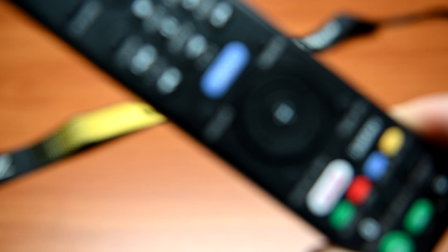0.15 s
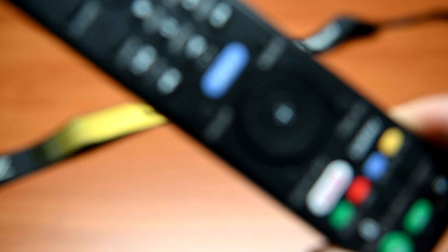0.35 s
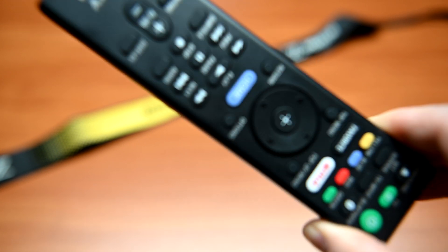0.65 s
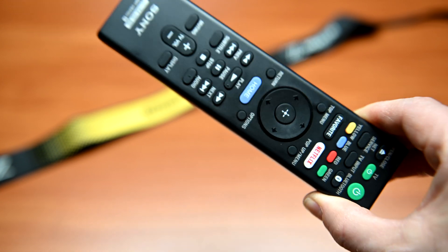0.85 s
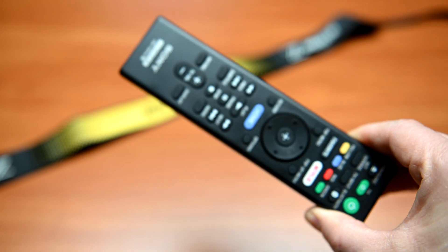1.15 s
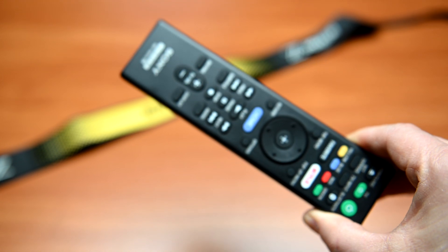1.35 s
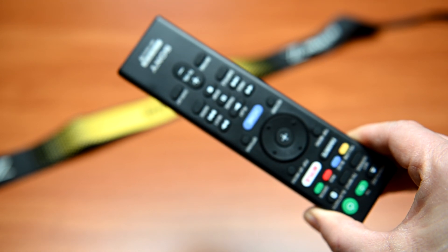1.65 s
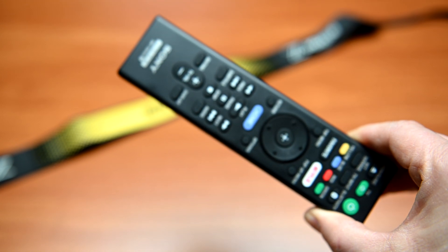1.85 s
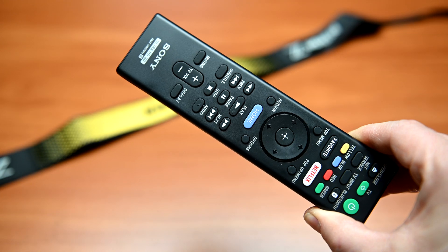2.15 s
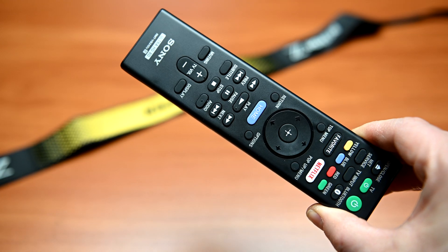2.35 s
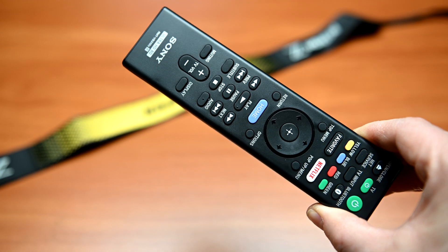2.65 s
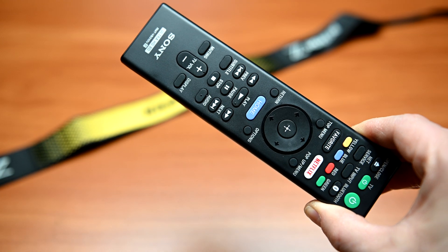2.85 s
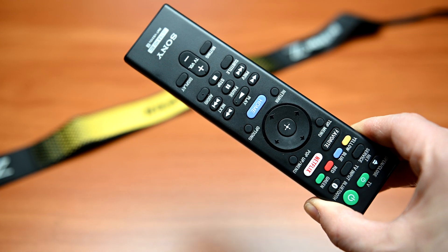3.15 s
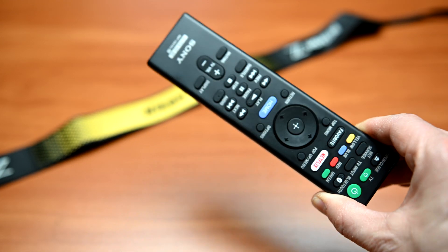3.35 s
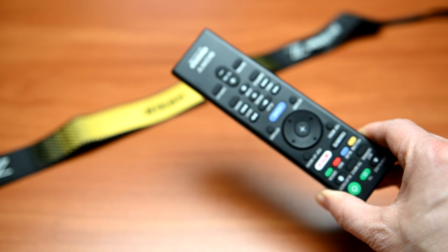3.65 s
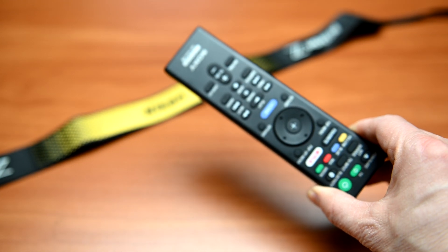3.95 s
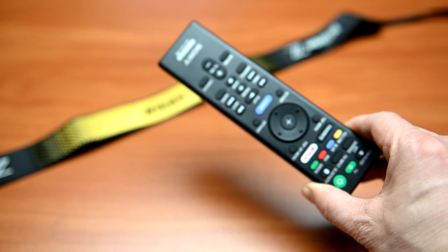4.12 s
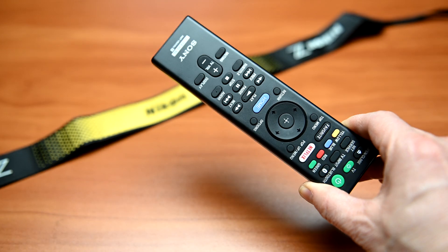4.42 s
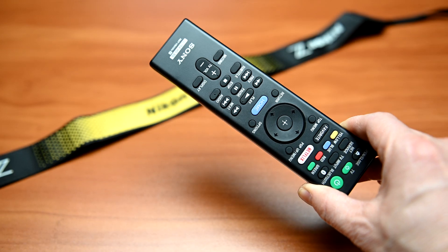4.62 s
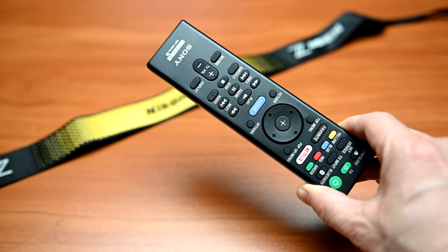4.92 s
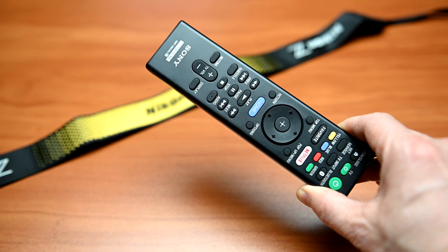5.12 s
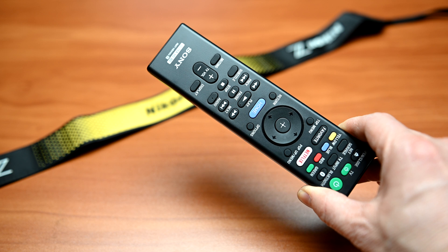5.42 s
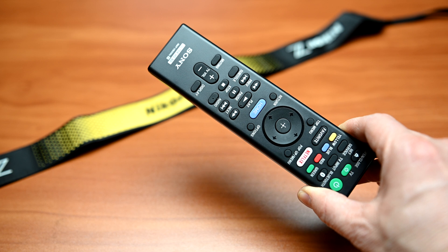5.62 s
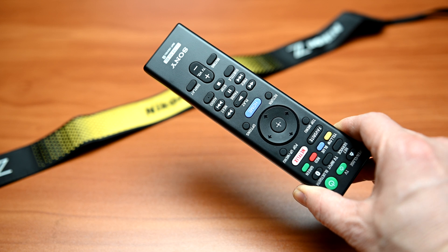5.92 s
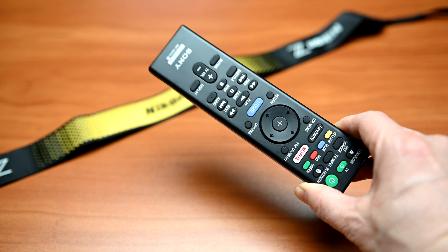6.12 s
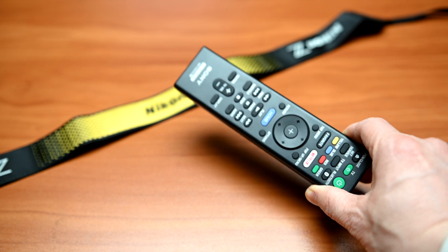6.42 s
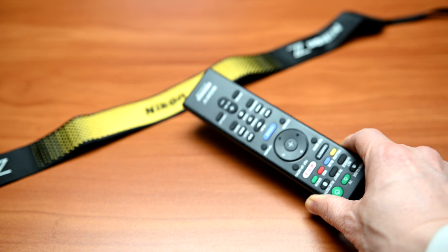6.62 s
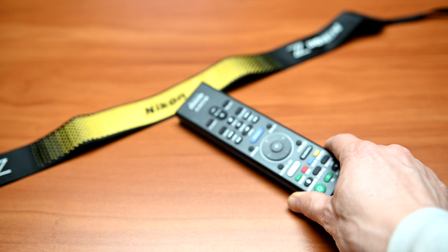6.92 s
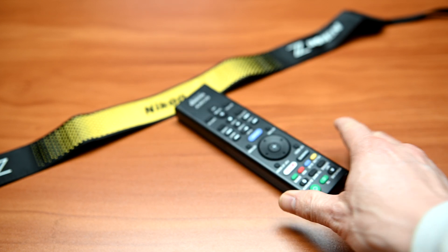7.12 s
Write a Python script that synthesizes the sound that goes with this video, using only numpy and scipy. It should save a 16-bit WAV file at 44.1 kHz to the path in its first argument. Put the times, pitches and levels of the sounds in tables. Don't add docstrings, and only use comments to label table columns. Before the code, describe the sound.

Very close to the microphone, a camera lens motor makes small, dry, rattling clicks in irregular trains separated by quiet gaps. Beneath lies a faint steady mains hum with soft hiss and a distant appliance drone. The first two seconds are nearly empty. Near the end a plastic remote control lands on the wooden table with a sharp clack, much louder than the clicks, and rocks briefly as the fingers let go.

```python
import sys
import numpy as np
from scipy import signal
from scipy.fft import rfft, irfft, next_fast_len
from scipy.io import wavfile

SR = 44100
rng = np.random.default_rng(int(sys.argv[2]) if len(sys.argv) > 2 else 0)


def attenuation_scalar(level_db):
    decades = np.asarray(level_db, float) / 20
    return 10 ** decades


def materialize(psi):
    bounded = np.clip(np.atleast_2d(psi).T, -1, 1)
    quanta = np.round(bounded * 32767).astype(np.int16)
    wavfile.write(sys.argv[1], SR, quanta)


N = 320607

# multiple of the mains tone, left level [dB], right level [dB].
HUM = [(1, -75.5, -79), (2, -61, -60.5), (3, -64.5, -63.5), (5, -80, -80.5), (6, -108, -96),
       (7, -86, -78.5), (7.5, -82, -98)]
MAINS_HZ = 120.05
# frequency [Hz], density [dB per Hz].
AIR = [(12, -50), (25, -23), (80, -21), (150, -20), (206, -27), (320, -27), (500, -28), (1050, -29),
       (2500, -34), (6000, -37), (15800, -39), (16000, -52), (16300, -90)]
# frequency [Hz], likeness [0-1].
AIR_ALIKE = [(60, 0.58), (130, 0.62), (640, 0.2), (1400, 0.15), (3000, 0)]
# frequency [Hz], width [Hz], level [dB].
DRONE = [(118.4, 2.6, 2.5), (235, 31, -9.5), (346, 58, -11), (474, 134, -16.5), (620, 125, -17),
         (912, 145, -18), (1413, 77, -17.5), (2100, 760, -25)]
# frequency [Hz], t60 [s].
ROOM_DECAY = [(150, 0.44), (1000, 0.11), (2000, 0.22), (4000, 0.14), (10000, 0.14)]

# time [s], level [dB].
ARM_SHIFTS = [(.1, -59), (3.472, -54.5), (3.894, -69), (6.28, -61.5), (6.474, -54.5), (6.796, -60.5)]
ARM_RISE_DB_S, ARM_FALL_DB_S = 66, 45.5
# frequency [Hz], width [Hz], level [dB].
TABLE_TOP = [(119.4, 6.9, -4), (165, 51, -5.5), (205.7, 43, -5.5), (287.6, 21.6, 3.5), (457, 58, -14.5),
             (512, 120, -19.5)]
# time [s], scrape level [dB].
FINGER_SCRAPES = [(7.03, -45.5), (7.055, -50), (7.09, -51.5), (7.138, -39), (7.18, -38), (7.2, -58),
                  (7.255, -52.5)]
SLIDE_RISE_DB_S, SLIDE_FALL_DB_S = 800, 809
# time [s], level [dB].
ROCKS = [(7.145, -18.5), (7.153, -16.5), (7.18, -13.5), (7.196, -18), (7.218, -22), (7.231, -30)]
# frequency [Hz], width [Hz], level [dB].
BOARD = [(123, 12, -14), (297, 11, 2), (328, 9.1, 5.5), (354, 11, 6), (566, 32, -4)]

# time [s], peak [dB], table knock [dB], hardness [0-1].
CONTACTS = [
    (6.8786, -53.5, -15, .95),
    (6.883, -56, -9, .95),
    (6.9661, -10.5, -15, 1),
    (6.98, -41, -19, 0.5),
    (7.124, -44.5, 5, 0.6),
    (7.1696, -20.5, -28, 0.29),
    (7.257, -42, -16, 0.34),
]
# frequency [Hz], width [Hz], level [dB].
CASE = [(542, 35, -11), (737, 55, 0), (863, 113, 1.5), (1060, 260, -1), (1310, 400, -5.5), (1587, 67, 1.5),
        (1930, 150, -2), (2435, 155, 1), (2600, 190, -0.5), (2940, 210, 1), (3340, 400, -0.5),
        (4230, 740, -9), (5100, 260, -2.5), (6030, 390, -7.5), (7020, 270, -3), (9800, 4000, -13),
        (11500, 3000, -26)]
# start [s], frequency [Hz], level [dB], t60 [s].
CREAKS = [(3.668, 776, -37, 0.019), (3.668, 1430, -54, 0.014), (3.669, 2600, -52, 0.0079),
          (3.827, 5000, -54, 0.013), (2.0756, 3350, -33, 0.019), (6.877, 5100, -40, 0.0033),
          (6.967, 831, -37, 0.14), (6.967, 1592, -33.5, 0.15), (7.17, 1660, -29.5, 0.029)]

# start [s], start level [dB], move [s], stop level [dB].
MOVES = [(2.0714, -30, 0.007, -36), (2.1118, -39.5, 0.0048, -55), (2.3377, -31.5, .0084, -32.5),
         (2.5031, -40.5, 0.0031, -31.5), (3.3358, -31, 0.007, -42), (3.3704, -33, .0056, -42),
         (3.4041, -31.5, 0.0048, -46), (3.4377, -33, .0041, -29.5), (3.4719, -31.5, .0051, -43),
         (4.5037, -29, 0.0043, -30.5), (4.5354, -41, .004, -43), (4.7549, -34, .0058, -31),
         (4.7706, -37, .0043, -48), (4.844, -32, .0065, -35), (4.9382, -33, 0.0046, -32.5),
         (4.9716, -36, .0043, -28), (5.006, -33, .0058, -41), (5.2375, -38, 0.0055, -29.5),
         (5.3722, -44, 0.0048, -30.5), (6.3409, -32, 0.011, -27.5), (6.3748, -31.5, 0.009, -28),
         (6.4054, -31, 0.0099, -28.5)]
# time [s], level [dB].
NUDGES = [(2.407, -31), (2.443, -30.5), (4.702, -29.5), (4.8071, -29.5), (4.8716, -31.5), (5.0732, -30.5),
          (5.172, -28), (5.2049, -28), (5.273, -32.5), (6.4486, -29)]
# time [s], level [dB].
BACKLASH = [(2.1367, -36.5), (2.172, -58), (2.2017, -32.5), (3.3577, -32.5), (3.485, -30.5), (4.553, -51),
            (4.6282, -34.5), (4.7269, -31.5), (4.7688, -37)]
# start [s], end [s], level [dB].
TRAVEL = [(2.076, 2.19, -53), (4.527, 4.622, -53.5), (6.35, 6.435, -57)]
FULL_SPEED_S, SPEED_UP_DB_S, SLOW_DOWN_DB_S = 0.026, 90, 126
# frequency [Hz], width [Hz], level [dB].
SHELL = [(211, 28, -6), (290, 205, -6), (409, 43.5, 5), (560, 67, 1), (671, 59, 3), (825, 34, -12),
         (912, 33, -19.5)]
BARREL = [(1085, 86, 4), (1348, 87, 4), (1617, 293, 4), (2180, 970, -3.5), (3120, 280, 0.5),
          (3350, 295, -1), (3670, 610, -3), (4670, 1550, -12)]
GEARS = [(6300, 1060, -2.5), (8510, 470, 1.5), (10300, 1250, -2.5), (11150, 700, 1), (12300, 1080, -1),
         (14900, 680, 4)]
USUAL_DB = -34
EDGE_DB, THUMP_DB = [-4, -18, -6.5, -18], [-4.5, -4.5, -1.5, -4.5]
EDGE_FOLLOWS, THUMP_FOLLOWS, SCATTER_DB = 0.88, 0.37, 0.63
REBOUND_S, REBOUND_DB, REBOUND_THUMP_DB = .006, -11.5, -5


def unit(x):
    return x / np.sqrt(np.mean(x ** 2) + 1e-20)


def along(points, hz):
    f, v = np.transpose(points)
    return np.interp(np.log(hz + 1), np.log(f + 1), v)


def filtered(x, response):
    m = next_fast_len(N + SR // 4, real=True)
    return irfft(rfft(x, m) * response(np.fft.rfftfreq(m, 1 / SR)), m)[..., :N]


def above(hz, order=2):
    return lambda f: (1j * f / (hz + 1j * f)) ** order


def body(modes, sign=-1):
    size = SR / (2 * np.pi * sum(attenuation_scalar(db) * width for _, width, db in modes))

    def response(f):
        total = 0
        for k, (centre, width, db) in enumerate(modes):
            loss = 1j * f * width
            total = total + sign ** k * attenuation_scalar(db) * loss / (centre * centre - f * f + loss)
        return total * size
    return response


def pair(alike, spiky_db=0):
    a, b = rng.standard_normal((2, N)) * attenuation_scalar(spiky_db * rng.standard_normal(N))
    turn = np.arccos(np.clip(alike, -1, 1)) / 2
    mid, side = np.cos(turn) * a, np.sin(turn) * b
    return unit(np.array([mid + side, mid - side]))


def bursts(times, db, rise, fall):
    lead = 400
    t = np.arange(-lead, 1601) / SR
    shape = np.where(t < 0, np.clip(1 + t / rise, 0, 1) ** 0.21, np.exp(-np.abs(t) / fall))
    marks = np.bincount(np.round(np.asarray(times) * SR).astype(int), attenuation_scalar(db), N)
    return signal.oaconvolve(marks, shape / np.linalg.norm(shape))[lead:lead + N]


def swells(rows, rise_db_s, fall_db_s):
    t = np.arange(N) / SR
    return sum(attenuation_scalar(db - np.maximum(rise_db_s * (s - t), fall_db_s * (t - s))) for s, db in rows)


def routes(count, size, t60, apart):
    lag = np.arange(count) / SR
    shared, own = rng.standard_normal((2, count))
    echoes = shared + apart * np.outer([1, -1], own)
    return (lag == 0) + size * attenuation_scalar(-60 * lag / t60) * echoes


def through(blow, paths):
    return signal.oaconvolve(blow[None], paths, axes=1)[:, :N]


def quiet_room():
    t = np.arange(N) / SR
    hum = 0
    for k, left_db, right_db in HUM:
        tone = np.sin(2 * np.pi * (k * MAINS_HZ * t + rng.random()))
        hum = hum + np.sqrt(2) * attenuation_scalar([[left_db], [right_db]]) * tone

    def mid_side(hz):
        turn = np.arccos(np.clip(along(AIR_ALIKE, hz), -1, 1)) / 2
        return attenuation_scalar(along(AIR, hz)) * np.array([np.cos(turn), np.sin(turn)])
    mid, side = filtered(rng.standard_normal((2, N)), mid_side)
    hiss = unit(np.array([mid + side, mid - side]))
    drone = unit(filtered(pair(0.17), body(DRONE)))
    return hum + attenuation_scalar(-65) * drone + attenuation_scalar(-61.5) * hiss


def room(x):
    hz, t, z = signal.stft(rng.standard_normal((2, SR // 2)), SR, nperseg=256)
    decay = attenuation_scalar(-60 * t / along(ROOM_DECAY, hz)[:, None])
    tail = signal.istft(z * decay, SR, nperseg=256)[1]
    late = np.pad(x, ((0, 0), (200, 0)))
    return signal.fftconvolve(late, tail / np.linalg.norm(tail[0]), axes=1)[:, :N]


def table():
    wood = filtered(pair(0.99), lambda f: body(TABLE_TOP)(f) * above(260)(f))
    murmur = swells(ARM_SHIFTS, ARM_RISE_DB_S, ARM_FALL_DB_S) * unit(wood)
    skin = filtered(pair(0.95, spiky_db=8.5), lambda f: body(CASE)(f) / (1 + 1j * f / 1100) ** 2)
    scrape = swells(FINGER_SCRAPES, SLIDE_RISE_DB_S, SLIDE_FALL_DB_S) * unit(skin)
    s, db = np.transpose(ROCKS)
    rocking = filtered(bursts(s, db - 18.0, rise=0.00039, fall=0.00052), body(BOARD, sign=0.73))
    return murmur + scrape + rocking


def creaks():
    out, t = np.zeros(N + SR), np.arange(SR // 4) / SR
    for start, hz, db, t60 in CREAKS:
        out[round(start * SR):][:len(t)] += attenuation_scalar(db - 60 * t / t60) * np.sin(2 * np.pi * hz * t)
    return out[:N]


def remote():
    s, db, knock_db, hardness = np.transpose(CONTACTS)
    hardness = np.clip(hardness, .01, .99)
    paths = routes(count=600, size=.07, t60=0.025, apart=0.64)

    def blow(share):
        return through(bursts(s, db + 20 * np.log10(share) + 11, rise=.00005, fall=.00004), -paths)
    crack = bursts(s, db + 20 * np.log10(hardness) + 17, rise=0.00016, fall=0.00069) * pair(.8)
    hard = filtered(blow(hardness), lambda f: attenuation_scalar(6.5) * body(CASE)(f))
    hard = hard + filtered(crack, above(10200, order=4))
    soft = filtered(blow(1 - hardness), lambda f: attenuation_scalar(4) * body(CASE, sign=1)(f) / (1 + 1j * f / 2200) ** 2)
    push = bursts(s, db + knock_db - 5.0, rise=0.00065, fall=0.00013)
    knock = filtered(push, lambda f: body(TABLE_TOP, sign=1)(f) * above(80)(f))
    return hard + soft + knock + creaks()


def jolts():
    start, start_db, move, stop_db = np.transpose(MOVES)
    kinds = [(start, start_db), (start + move, stop_db), np.transpose(NUDGES), np.transpose(BACKLASH)]
    s, db = np.concatenate(kinds, axis=1)
    kind = np.repeat(np.arange(len(kinds)), [len(k[0]) for k in kinds])
    chance = rng.standard_normal((len(s), 3))
    extra_db = db - USUAL_DB
    edge_db = USUAL_DB + np.take(EDGE_DB, kind) + EDGE_FOLLOWS * extra_db + SCATTER_DB * chance[:, 0]
    thump_db = USUAL_DB + np.take(THUMP_DB, kind) + THUMP_FOLLOWS * extra_db + SCATTER_DB * chance[:, 1]
    first = np.array([s, db, edge_db, thump_db])
    delay = REBOUND_S * np.exp(0.1465 * chance[:, 2])
    weaker = np.outer([REBOUND_DB, REBOUND_DB, REBOUND_THUMP_DB], np.ones(len(s)))
    bounce = first + np.vstack([delay, weaker])
    return np.concatenate([first, bounce[:, kind % 2 == 1]], axis=1)


def shell(f):
    return body(SHELL, sign=1)(f) * above(170)(f)


def lens_travel():
    rattle = pair(0.39, spiky_db=9.5)
    whir = unit(filtered(rattle, lambda f: body(BARREL)(f) / (1 + 1j * f / 2600)))
    whir = whir + attenuation_scalar(3.5) * unit(filtered(rattle, shell))
    whir = whir + attenuation_scalar(-23) * unit(filtered(rattle, body(GEARS)))
    t, speed = np.arange(N) / SR, 0
    for start, end, db in TRAVEL:
        moving = (t > start) & (t < end)
        speed = speed + moving * swells([(start + FULL_SPEED_S, db)], SPEED_UP_DB_S, SLOW_DOWN_DB_S)
    return whir * speed


def lens():
    s, blow_db, edge_db, thump_db = jolts()
    paths = routes(count=220, size=.13, t60=.0081, apart=.3)

    def strike(db, early=.0004):
        return through(bursts(s - early, db, rise=.00008, fall=.00006), paths)
    thump = strike(thump_db - 2)
    thump = thump + bursts(s, thump_db + 5, rise=0.00095, fall=0.0045) * pair(0.75)
    thump = thump + strike(edge_db - 6.5, early=0.00248)
    scratch = bursts(s, edge_db + 17.0, rise=0.0022, fall=0.0016)
    hit = bursts(s, blow_db + 7.5, rise=0.00085, fall=0.0015)
    settle = bursts(s, blow_db + 8.5, rise=0.0009, fall=0.0037)
    clack = strike(blow_db + 2) + (hit + attenuation_scalar(-4) * scratch + settle) * pair(0.7, spiky_db=3)
    mesh = bursts(s, edge_db - 10, rise=0.00066, fall=0.0032)
    edge = (scratch + mesh) * pair(0.074, spiky_db=7.0)
    blows = filtered(thump, shell) + filtered(clack, body(BARREL)) + filtered(edge, body(GEARS))
    return blows + lens_travel()


def scene():
    focus, knocks = lens(), remote()
    echo = room(attenuation_scalar(-16.0) * focus + attenuation_scalar(-8.0) * knocks)
    return focus + knocks + echo + table() + quiet_room()


def top_cut(x):
    return signal.sosfilt(signal.butter(12, 16670, fs=SR, output="sos"), x)


def record(dry):
    top_hz = 16400
    return top_cut(filtered(dry, lambda hz: hz < top_hz))


dry = scene()
out = record(dry)
materialize(out)
```